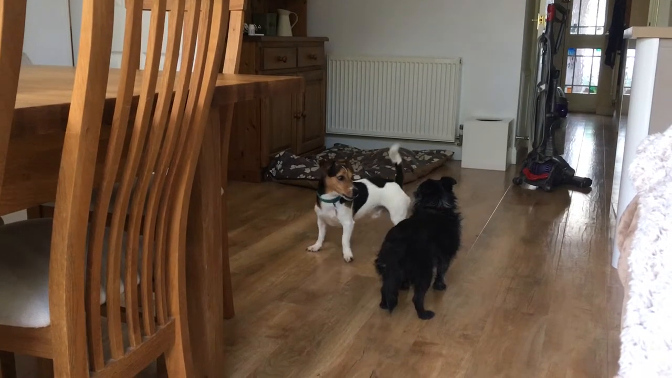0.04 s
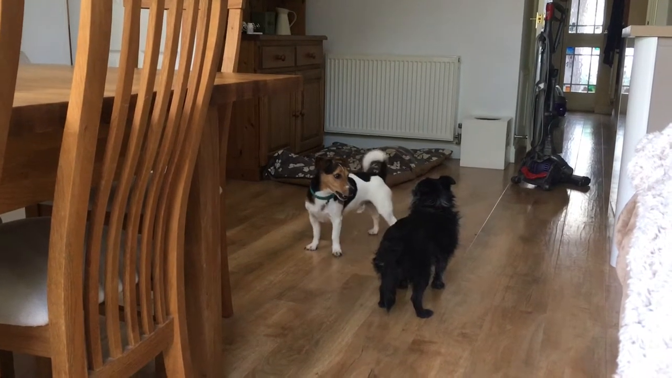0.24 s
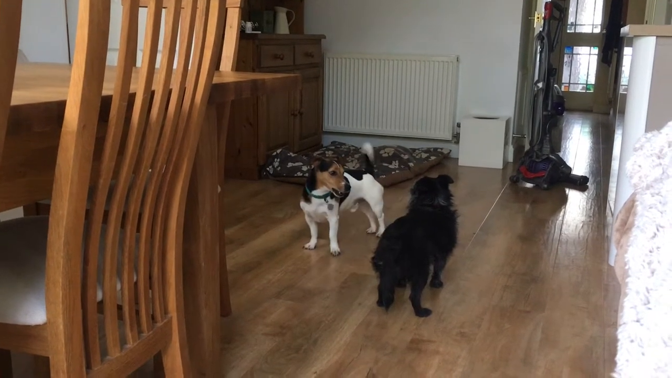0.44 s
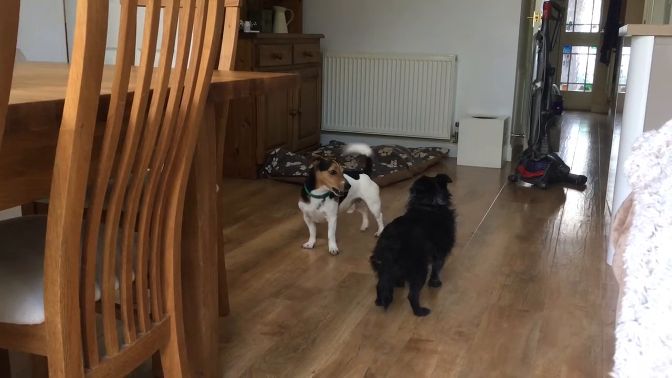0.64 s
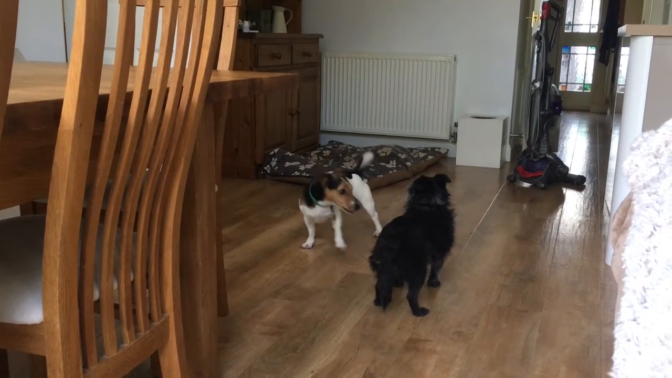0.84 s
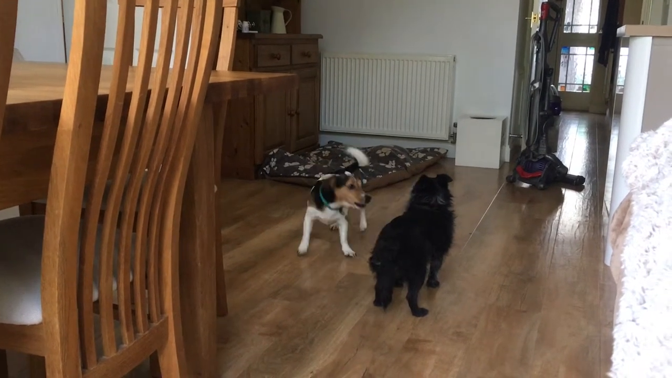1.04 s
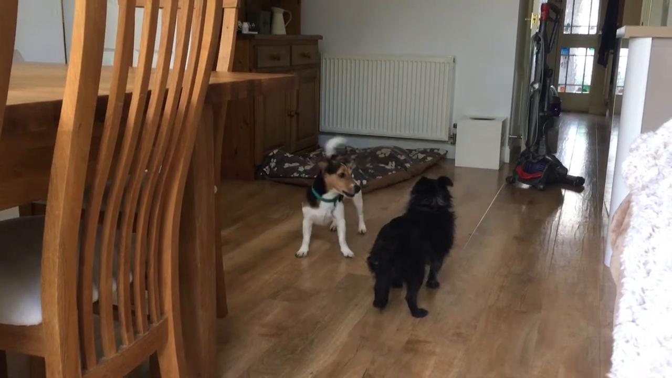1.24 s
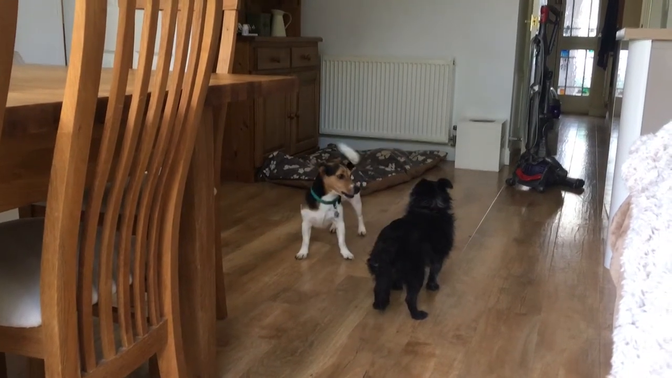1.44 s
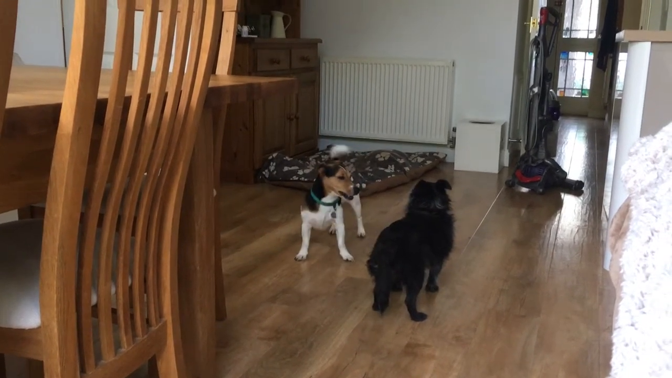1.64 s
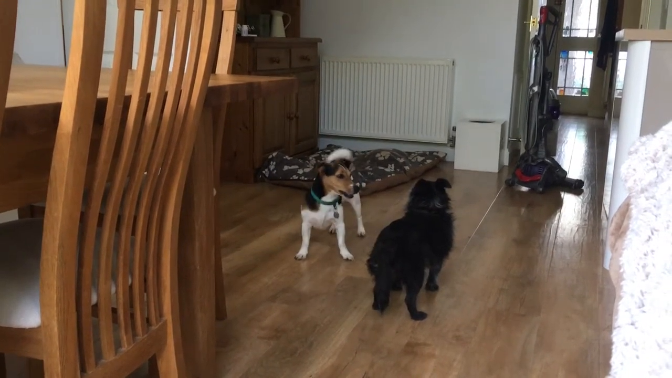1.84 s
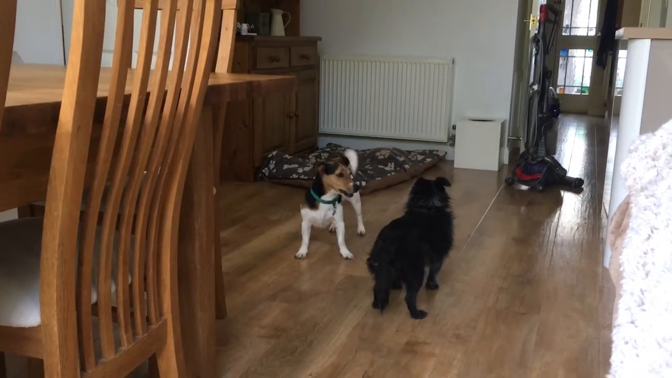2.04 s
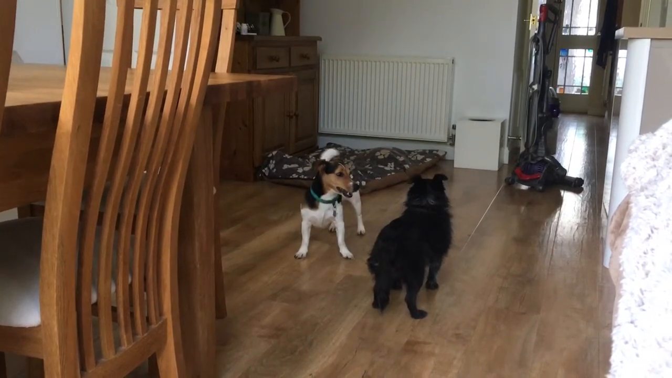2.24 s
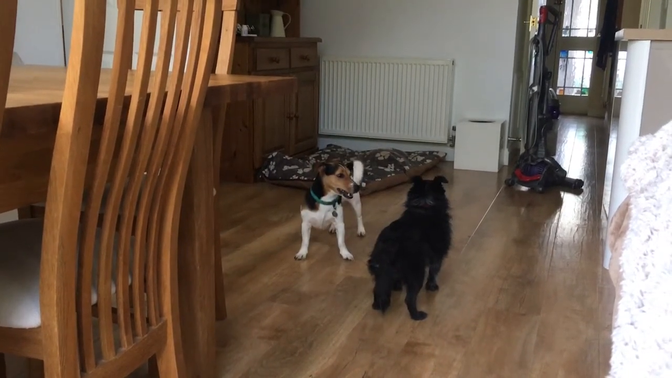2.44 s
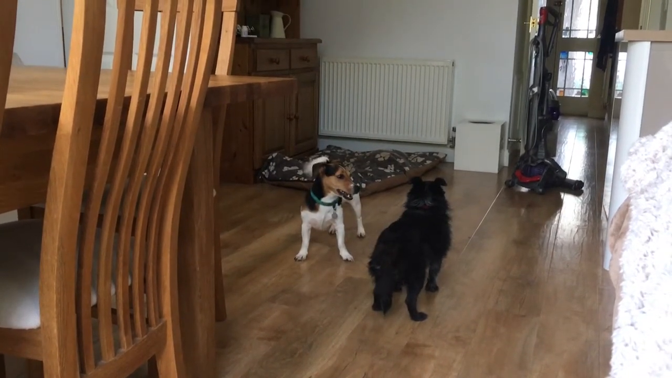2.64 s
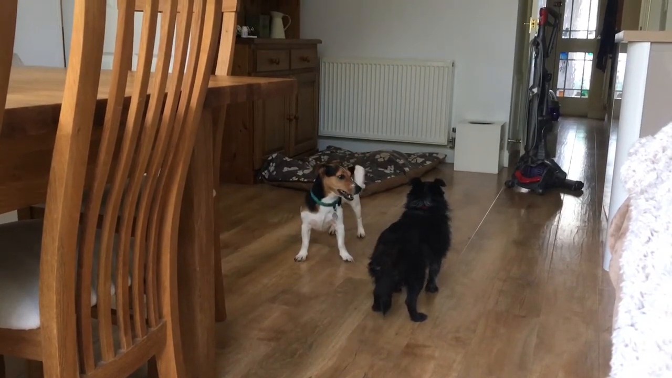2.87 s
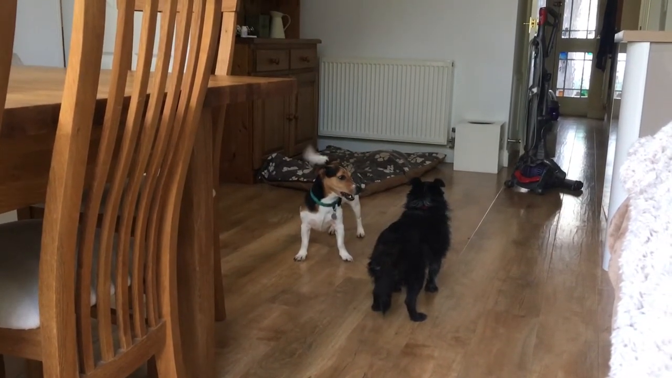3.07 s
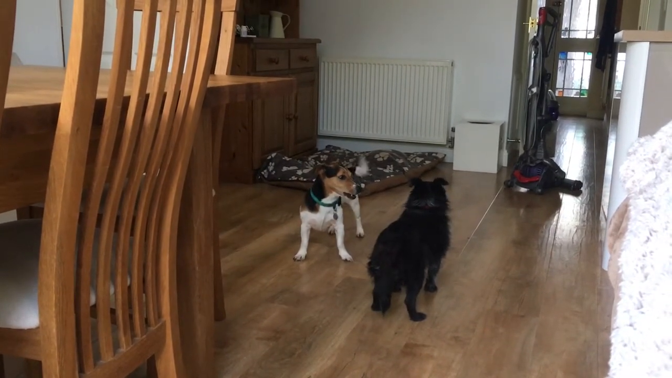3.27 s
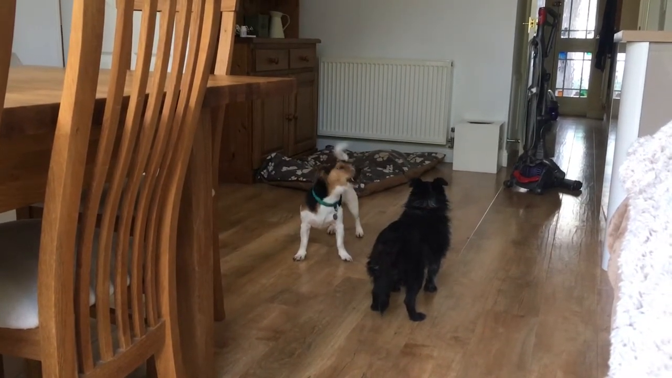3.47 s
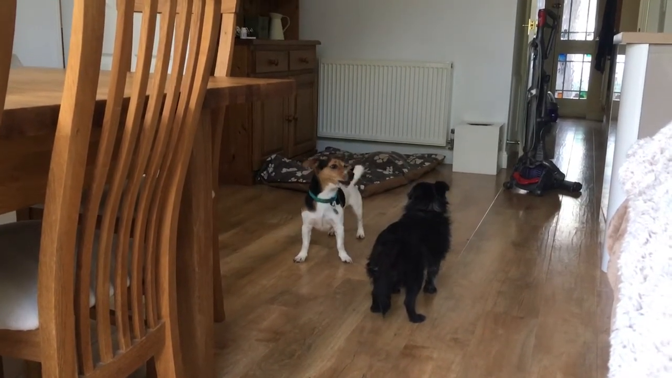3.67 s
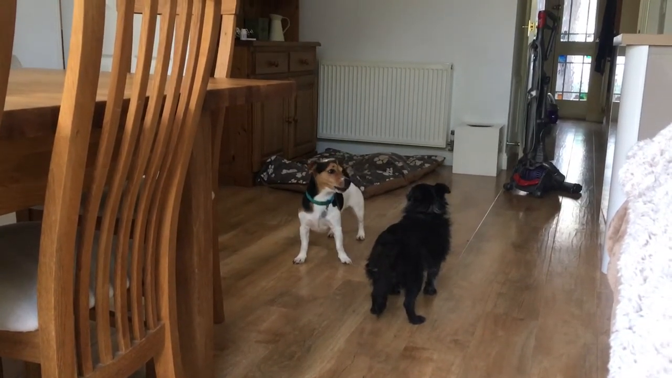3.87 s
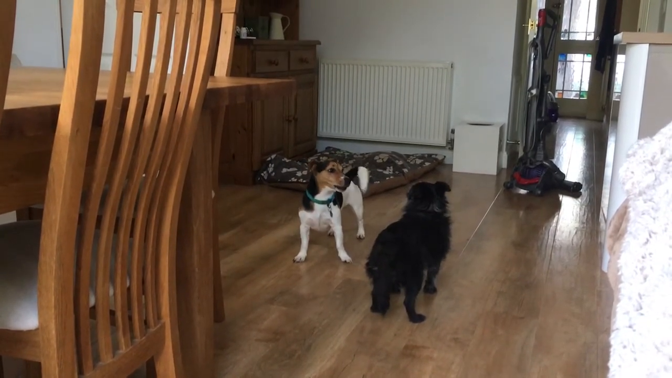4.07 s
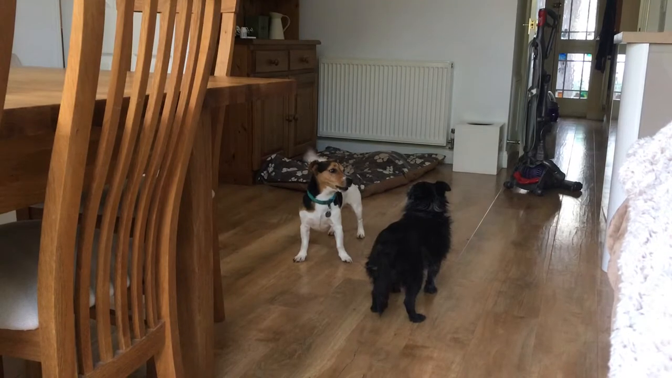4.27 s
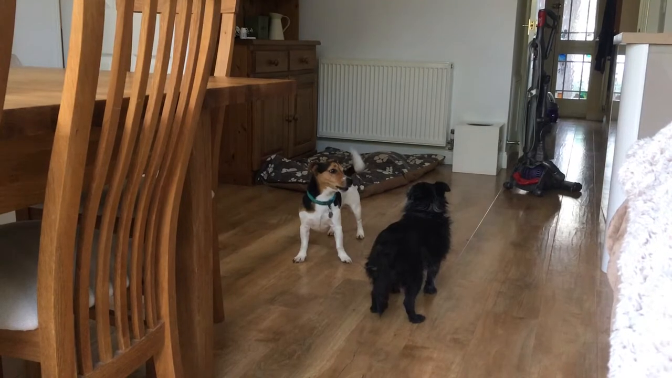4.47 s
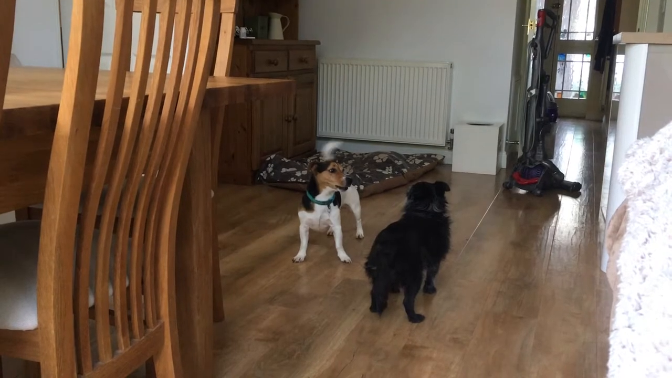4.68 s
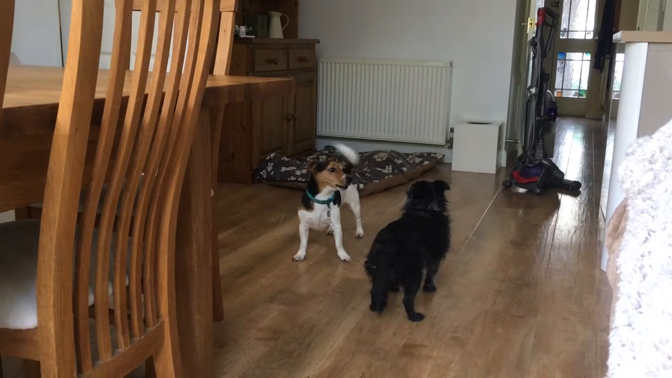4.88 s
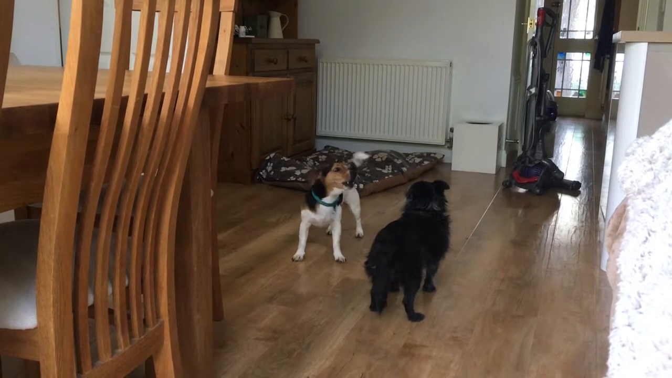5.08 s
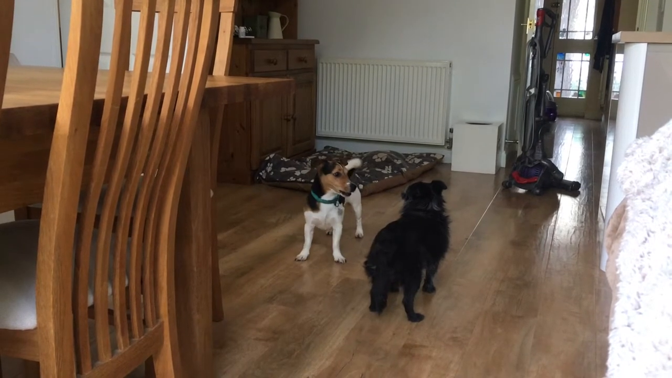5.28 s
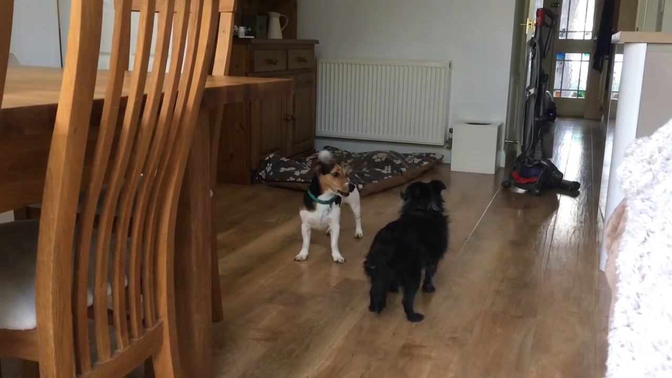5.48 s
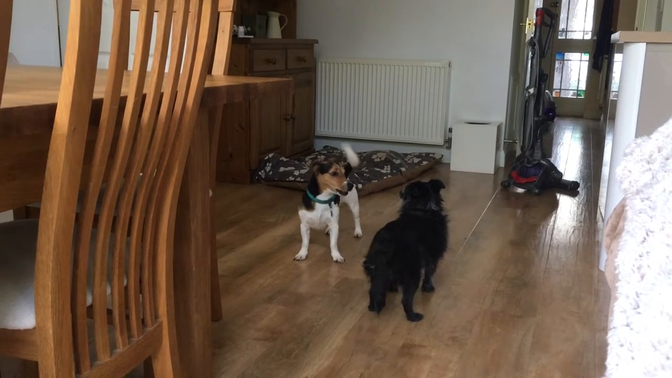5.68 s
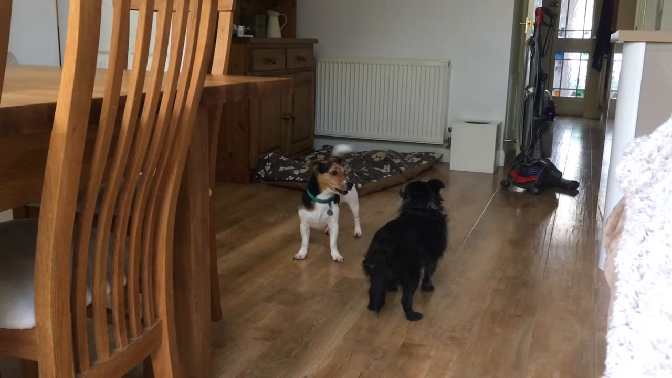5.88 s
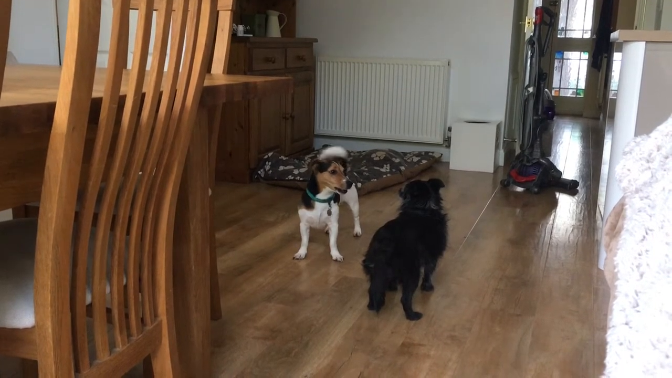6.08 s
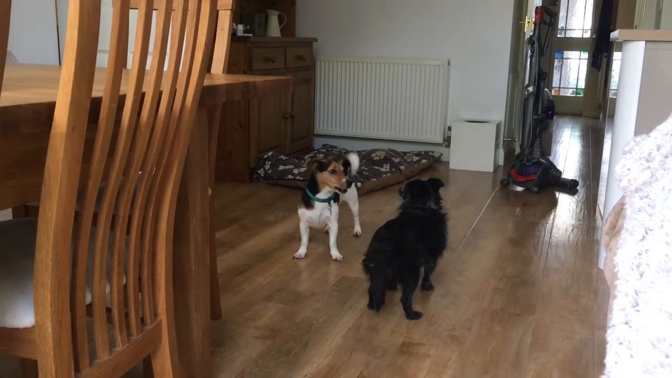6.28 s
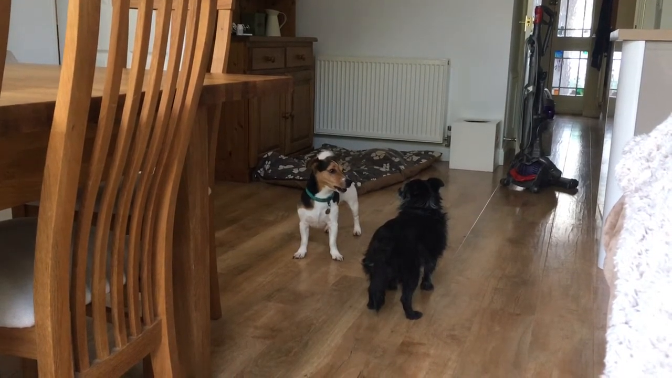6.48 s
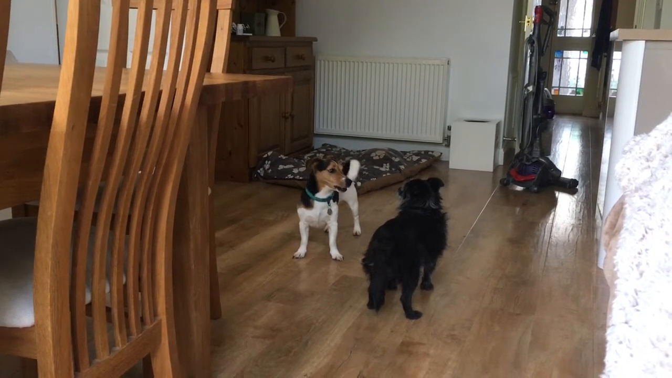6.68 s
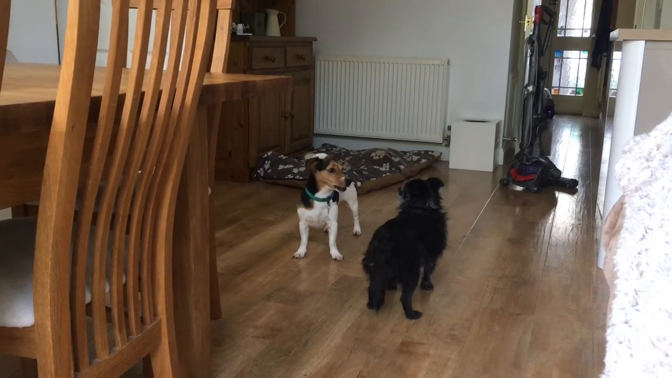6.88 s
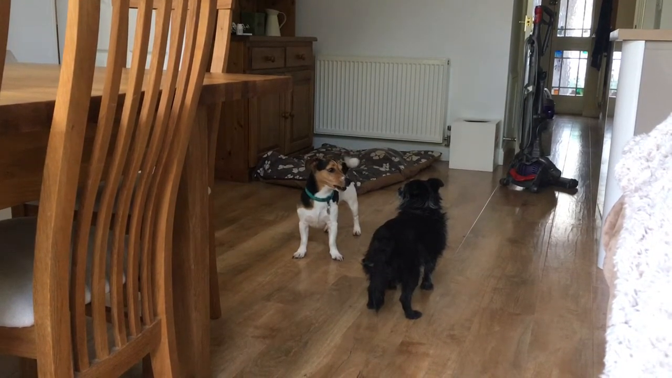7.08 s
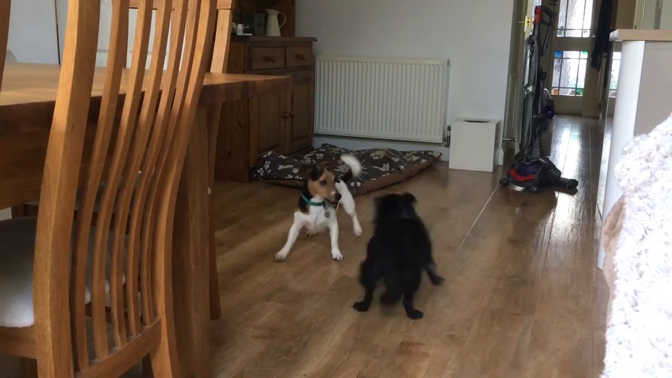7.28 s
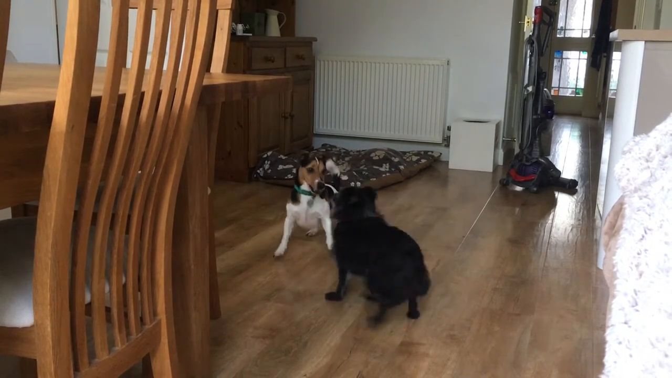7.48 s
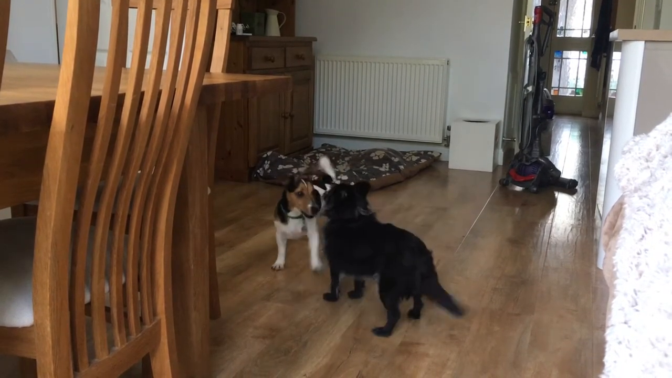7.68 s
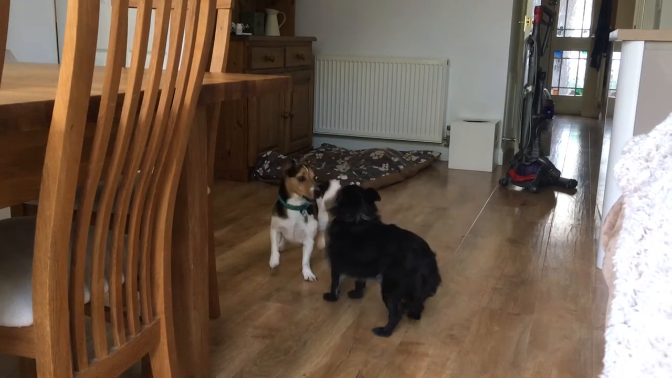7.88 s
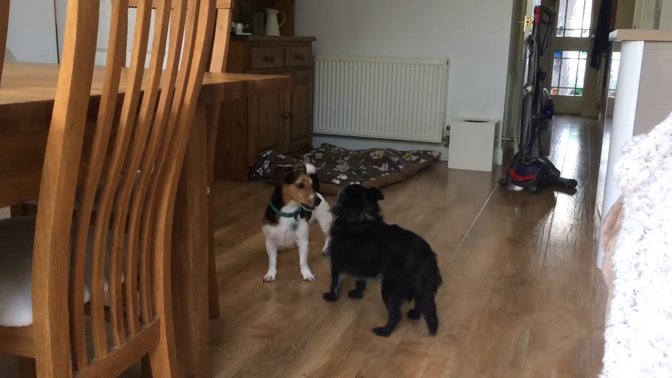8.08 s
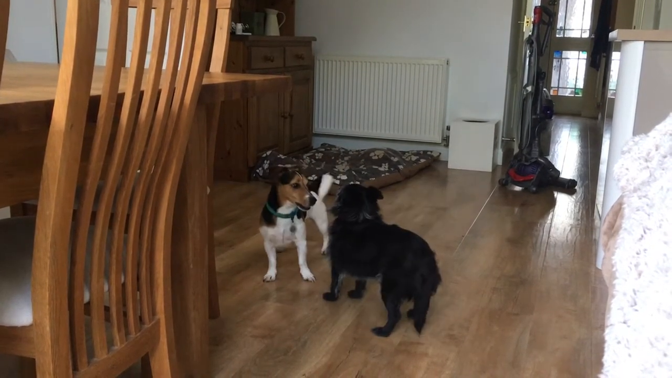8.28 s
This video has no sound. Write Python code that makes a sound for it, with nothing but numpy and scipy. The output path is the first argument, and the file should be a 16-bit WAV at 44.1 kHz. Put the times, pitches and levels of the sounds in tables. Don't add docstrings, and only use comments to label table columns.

```python
import sys
import numpy as np
from scipy import signal
from scipy.fft import rfft, irfft
from scipy.io import wavfile
from scipy.ndimage import uniform_filter1d, minimum_filter1d

SR = 44100
rng = np.random.default_rng(int(sys.argv[2]) if len(sys.argv) > 2 else 0)


def level_to_linear(level):
    exponent = np.asarray(level, float) / 20
    return 10 ** exponent


def wav_record(signal):
    frames = np.transpose(np.atleast_2d(signal))
    bounded = np.clip(frames, -1, 1)
    quanta = np.round(bounded * 32767).astype(np.int16)
    wavfile.write(sys.argv[1], SR, quanta)


N = 366912
LEAD = SR // 4

# time_s, effort_db, rate_per_s
WOOF = [
    (-.16, -31.5, 87),
    (-.12, -20, 168),
    (-.02, -27.5, 142),
    (.05, -36, 150),
    (.16, -51.5, 110),
]
# centre_hz, width_hz, level_db
WOOF_MUZZLE = [(616, 210, 5), (1040, 220, 2), (1415, 210, -7), (1730, 440, -17.5), (2260, 390, -26.5),
               (3830, 1040, -31.5), (5730, 740, -34), (6900, 460, -25), (8910, 1800, -25),
               (12800, 4000, -27)]
# start_s, swell_s, first_db, peak_db, first_rate_per_s
GROWLS = [
    (.957, 0.02, -50, -35, 170),
    (3.41, .13, -54.5, -32, 33),
    (4.88, .19, -63.5, -32.5, 45),
]
# centre_hz, width_hz, level_db
CHEST = [(105, 17, -9.5), (152.78, 86, -4.5), (285, 130, -1)]
# centre_hz, width_hz, level_db
MUZZLE = [(620, 300, 2.5), (850, 140, -9.5), (1118.8, 140, 5), (1480, 100, -13.5), (1850, 200, -10.5),
          (2110, 120, -12), (2500, 200, -13), (3900, 800, -17.5), (5950, 560, -18), (9600, 2400, -17.5)]
# band_hz, t60_s
ROOM_DECAY = [(100, .45), (300, 0.49), (700, .62), (1500, 0.61), (3000, 0.57), (5000, 0.48), (8000, 0.4),
              (11000, .38), (16000, .28)]
# mode_hz, level_db
STANDING_WAVES = [(598, 0), (666, 5.5), (1031, 3.5), (1088, 7.5), (1179, 5.5), (1339, 2), (1832, -0.5),
                  (1900, 5)]
# band_hz, density_db_per_hz
HUSH_TONE = [(35, -30), (60, -3), (76, -17), (118, -20.5), (156, -18.5), (417, -29.5), (553, -36.5),
             (882, -33), (1440, -42.5), (1950, -39.5), (2190, -39.5), (7940, -43.5), (14600, -37.5),
             (16000, -41.5)]
# time_s, level_db
HUM_COURSE = [(0, -59), (2.5, -56.5), (6, -61.5), (8.32, -60.5)]
# partial_hz, level_db
HUM_PARTIALS = [(48.5, -3), (97, -14)]
# start_s, length_s, peak_db, first_hz, last_hz
WHINES = [
    (.12, .11, -52, 1704, 2290),
    (3.75, .09, -49, 325, 235),
    (5.267, .09, -50.5, 313, 230),
]
# time_s, peak_db, room_share_db
CLAWS = [(0.2259, -42, 1.5), (0.2432, -41, -3.5), (1.6661, -57, 4.5), (1.922, -58.5, -4.5),
         (3.1676, -54, 2.5), (7.2539, -27, 2), (7.3706, -29.5, -1), (7.4824, -34, 3), (7.5248, -42, 1.5),
         (7.5488, -37.5, -2), (7.6096, -33.5, -4), (7.654, -32.5, -3), (7.666, -36.5, -4),
         (7.7332, -34, -6.5), (7.7677, -52.5, -0.5), (7.8309, -35.5, -4.5), (7.892, -41.5, -2.5),
         (7.9264, -38, -2.5), (8.0935, -41.5, -1.5), (8.1584, -43.5, -6.5)]
# time_s, peak_db
JINGLES = [(0.3151, -63), (0.4275, -57.5), (0.5112, -72), (0.82, -59), (0.9352, -70), (1.6646, -60),
           (1.9005, -72), (1.9235, -56), (2.7916, -71), (3.1674, -65.5), (6.0581, -68), (6.7466, -76.5),
           (7.7677, -56), (7.875, -51), (7.892, -49), (7.9259, -43), (7.9887, -43.5), (8.0217, -56),
           (8.0494, -57.5), (8.1584, -43.5)]
# mode_hz, level_db, t60_s
TAG_MODES = [(8860, -1.5, .15), (8560, -2.5, 0.099), (8400, -10.5, 0.065), (11700, -14, 0.12),
             (12696, -18, .08), (15080, -18.5, 0.033)]
# time_s, peak_db
BUCKLE = [(7.256, -43.5), (7.292, -49), (7.372, -55), (8.032, -67)]
# mode_hz, level_db, t60_s
BUCKLE_MODES = [(9700, 1.5, 0.2), (9980, -8, .15), (14990, -0.5, 0.15)]
# start_s, peak_db, length_s, mouth_opening_factor
PANTS = [(.62, -77, 0.15, 1), (.805, -68, 0.13, 0.86), (1.77, -71.5, 0.15, 0.98), (2.18, -65.5, 0.15, 1.02),
         (2.54, -68, 0.18, 1.02), (2.9, -65, 0.16, 1), (3.295, -63.5, 0.21, 1.04), (4.58, -73, 0.15, 0.98),
         (5.74, -74, .18, 0.99), (7.783, -67.5, 0.11, 1.06), (8.24, -77, .1, 1.01)]
# centre_hz, width_hz, level_db
PANT_MOUTH = [(660, 230, 1), (965, 220, -14.5), (1420, 320, 0.5), (2000, 400, -10.5), (2480, 370, 0.5),
              (3100, 400, -5), (3900, 600, -15.5), (5972, 6600, -25)]
# start_s, length_s, effort_db, top_pitch_hz, end_fade_db
BARKS = [
    (.967, .145, -15.5, 675.5, 0.5),
    (3.522, 0.16, -15, 647.7, -2),
    (5.056, .165, -15, 640.6, -0.5),
]
# centre_hz, width_hz, level_db
THROAT = [(790, 250, -7), (1060, 200, -1.5), (1330, 160, -4), (1620, 250, -10), (2150, 300, -16),
          (2750, 450, -20), (3200, 420, -18)]
# centre_hz, width_hz, level_db
RASP = [(3750, 800, -4.5), (4710, 400, 1.5), (5300, 510, -7), (6460, 600, 0), (7150, 360, -8),
        (8527, 770, 5), (9530, 1200, -9), (11000, 800, -4), (12300, 1800, -7.5), (14200, 1200, -8),
        (15320, 1000, -6)]
# time_s, peak_db, board_hz
THUDS = [(6.664, -48.5, 153), (6.714, -48.5, 154), (6.764, -55.5, 151), (6.814, -51.5, 157),
         (6.869, -62, 151), (6.993, -54.5, 151), (7.048, -59, 150), (7.256, -55, 148.4),
         (7.369, -54.5, 139)]
# start_s, peak_db, t60_s
SCUFFS = [(7.2, -63, .6), (7.24, -48, .4), (7.35, -56, 1.4), (7.6, -61.5, 1.2), (7.9, -66.5, .9),
          (8.14, -64.5, .3)]
# band_hz, density_db_per_hz
SCUFF_TONE = [(1760, -13), (3000, -7.5), (4930, -14), (6130, -3.5), (8520, -8.5), (9870, 1.5),
              (10700, -16.5), (15400, 0.5), (16000, -14)]
# start_s, peak_db, length_s, note_hz
SKIDS = [(7.209, -60.5, 0.18, 2350), (7.357, -60.5, 0.088, 1480), (7.54, -71, 0.11, 2900),
         (7.788, -69.5, .14, 1500), (8.108, -75.5, 0.035, 2000)]
# band_hz, density_db_per_hz
COARSE_TONE = [(150, -29), (400, 2.5), (2000, 1), (8000, -3.5), (16000, -8.5)]


def evened(x):
    return x / np.sqrt(np.mean(x ** 2) + 1e-20)


def read(points, hz):
    f, value = np.transpose(points)
    return np.interp(np.log(hz + 1), np.log(f + 1), value)


def unroll(rows):
    s, *columns = np.transpose(rows)
    t = np.arange(s[0], s[-1], 1 / SR)
    return s[0], [np.interp(t, s, c) for c in columns]


def add(mix, s, sound):
    part = mix[round(s * SR) + LEAD:][:len(sound)]
    part += sound[:len(part)]


def resonate(x, hz, width):
    turn = np.exp(2j * np.pi * np.cumsum(hz * np.ones(len(x))) / SR)
    r = np.exp(-np.pi * width / SR)
    return 2 * (turn * signal.lfilter([(1 - r) ** 2], [1, -2 * r, r * r], x / turn)).real


def tract(x, modes, opening):
    return evened(sum((-1) ** k * level_to_linear(db) * resonate(x, hz * opening, w)
                      for k, (hz, w, db) in enumerate(modes)))


def wobble(size, span):
    return evened(uniform_filter1d(uniform_filter1d(rng.standard_normal(size), span), span))


def coloured(points, size):
    hz = np.fft.rfftfreq(size, 1 / SR)
    return evened(irfft(rfft(rng.standard_normal(size)) * level_to_linear(read(points, hz)), size))


def growl(rows, muzzle=MUZZLE, open_db=-10):
    s, (effort_db, rate) = unroll(rows)
    size = len(rate)
    turns = .9 + np.cumsum(rate * (1 + .1 * wobble(size, span=SR // 150))) / SR
    flaps = np.diff(np.floor(turns), prepend=0) * level_to_linear(2 * rng.standard_normal(size)) * np.sqrt(SR / rate)
    air = (0.6 + np.exp(-(turns % 1) / 0.4)) * rng.standard_normal(size)
    chest = tract(flaps + 0.8 * air, CHEST, 0.91)
    mouth = level_to_linear(open_db) * tract(0.15 * flaps + air, muzzle, 0.98)
    return s, level_to_linear(effort_db) * (chest + mouth) * signal.windows.tukey(size, .03)


def room(x):
    taps = np.zeros(SR)
    at = np.arange(160, SR - 20, 20)
    taps[at + rng.integers(0, 20, len(at))] = rng.choice([-1., 1.], len(at))
    hz, t, z = signal.stft(taps, SR, nperseg=256)
    tail = signal.istft(z * level_to_linear(-60 * t / read(ROOM_DECAY, hz)[:, None]), SR, nperseg=256)[1]
    tail = tail / np.linalg.norm(tail)
    t = np.arange(len(tail)) / SR
    tail = tail + sum(level_to_linear(db - 57.5 - 60 * t / .5) * np.sin(2 * np.pi * f * t) for f, db in STANDING_WAVES)
    return signal.fftconvolve(x, tail)[:len(x)]


def hush():
    duck_db, duck_s, hiss_db = -8.5, .55, -67
    t = np.arange(N) / SR
    ducked_db = sum(duck_db * np.sin(np.pi * np.clip((t - s) / duck_s, 0, 1)) for s, *_ in BARKS)
    turns = np.cumsum(1 + 0.028 * wobble(N, span=SR // 12)) / SR
    hum = sum(level_to_linear(db + 1.5 * wobble(N, span=SR // 10)) * np.sin(2 * np.pi * hz * turns)
              for hz, db in HUM_PARTIALS)
    hum_db = np.interp(t, *np.transpose(HUM_COURSE)) + ducked_db + 1.5
    return level_to_linear(hum_db) * hum + level_to_linear(hiss_db) * coloured(HUSH_TONE, N)


def whine(s, length, peak_db, first_hz, last_hz):
    hz = np.geomspace(first_hz, last_hz, round(length * SR))
    air = rng.standard_normal(len(hz))
    width = .1 * hz.mean()
    octave = level_to_linear(-14.5) * resonate(air, hz.mean() * 1.92, 4 * width)
    squeak = evened(resonate(air, hz, width) + octave)
    return s, level_to_linear(peak_db) * squeak * np.sin(np.linspace(0, np.pi, len(hz))) ** 1.5


def claw(hz):
    t = np.arange(SR // 50) / SR
    scrape = rng.standard_normal(len(t)) * (np.exp(-t / .0008) + 0.51 * np.exp(-t / 0.0014))
    tick = np.diff(resonate(scrape, min(hz, 15500), 14000), prepend=0)
    return level_to_linear(-9.0) * tick / np.std(tick[:SR // 500])


def ring(modes, factor):
    t = np.arange(SR // 4) / SR
    chatter = (1 - np.exp(-t / .005)) * level_to_linear(3.5 * wobble(len(t), span=SR // 250))
    return chatter * sum(level_to_linear(db - 60 * t / t60) * np.sin(2 * np.pi * hz * factor * t) for hz, db, t60 in modes)


def pant(s, peak_db, length, mouth):
    size = round(length * SR)
    puff = np.sin(np.pi * np.linspace(0, 1, size) ** 0.7) ** 0.79
    return s, level_to_linear(peak_db) * tract(rng.standard_normal(size), PANT_MOUTH, mouth) * puff


def swell(s, length, first_db, peak_db, first_rate):
    top_per_s, tail_s, tail_db = 175, .09, -13
    return [(s, first_db, first_rate),
            (s + .75 * length, 0.82 * peak_db + .3 * first_db, 1.4 * first_rate),
            (s + length, peak_db, top_per_s),
            (s + length + tail_s, peak_db + tail_db, top_per_s)]


def bark(s, length, effort_db, top_hz, fade_db):
    attack_s, attack_db = .058, -29
    pitch_shut, pitch_lag, climb_s, pitch_drop = .89, .08, .11, .07
    second_top_hz, second_shut, second_sag, second_grow_db = 1295, .86, .12, 4
    low_db, low_shut_db, low_sag_db = -1.5, 7.5, -11.5
    sum_db, bright_db, bright_sag_db = -6, -15, -4.5
    t = np.arange(0, length, 1 / SR)
    size = len(t)
    slack = np.maximum(1 - t / attack_s, 0) ** 1.6
    spent = t / length
    closed = np.exp(-(t / 0.03) ** 2)

    climb = pitch_lag * np.maximum(1 - t / climb_s, 0)
    hz = top_hz * (1 - (1 - pitch_shut) * slack - climb - pitch_drop * spent ** 6)
    second_hz = second_top_hz * (1 - (1 - second_shut) * slack - second_sag * spent)
    turns = np.cumsum(hz * (1 + .018 * wobble(size, span=SR // 400))) / SR
    folds = evened(sum(np.sin(2 * np.pi * k * turns) for k in range(1, 24)))
    folds = folds * level_to_linear(2.5 * wobble(size, span=SR // 300))
    second = np.cos(2 * np.pi * np.cumsum(second_hz * (1 + 0.013 * wobble(size, span=SR // 300))) / SR)
    second = second * (1 + 0.79 * np.cos(2 * np.pi * turns))
    puffs = evened((0.44 + np.exp(-(turns % 1) / 0.47)) * rng.standard_normal(size))
    drive = .6 * folds + .3 * second + .8 * puffs

    middle = level_to_linear(second_grow_db * spent) * evened(resonate(drive, second_hz, 190))
    middle = middle + level_to_linear(8.5 - 10 * closed) * tract(drive, THROAT, 1 - 0.06 * closed)
    low = level_to_linear(low_db + low_shut_db * slack + low_sag_db * spent) * evened(resonate(drive, hz, 150))
    summed = level_to_linear(sum_db - 12 * closed) * evened(resonate(drive, hz + second_hz, 180))
    tongue = (1 - 0.08 * closed) * (1 + 0.026 * wobble(size, span=SR // 50))
    cavities = [(f, w, db + 3.3 * wobble(size, span=SR // 50)) for f, w, db in RASP]
    rasp_db = bright_db + bright_sag_db * spent - 13 * closed
    rasp = level_to_linear(rasp_db) * tract(1.2 * folds + puffs, cavities, tongue)
    effort = level_to_linear(effort_db + attack_db * slack + fade_db * spent + 1.6 * wobble(size, span=SR // 60))
    return s, effort * (evened(middle) + low + summed + rasp) * signal.windows.tukey(size, .2)


def thud(s, peak_db, hz):
    t = np.arange(SR // 12) / SR
    board = np.sin(2 * np.pi * hz * t) + level_to_linear(-8.0) * np.sin(2 * np.pi * 1.774 * hz * t)
    knock = level_to_linear(-7.5) * resonate(rng.standard_normal(len(t)), 595, 890)
    return s, level_to_linear(peak_db) * (board + knock) * (t / 0.0049) * np.exp(1 - t / 0.0037)


def scuff(s, peak_db, t60):
    rise_s = .025
    t = np.arange(SR // 2) / SR
    fall_db = peak_db - 60 * t / t60 + 2.5 * wobble(len(t), span=SR // 150)
    stroke = np.minimum(t / rise_s, 1) * level_to_linear(fall_db)
    return s, stroke * coloured(SCUFF_TONE, len(t)) * np.cos(np.pi * t)


def skid(s, peak_db, length, hz):
    rub = rng.standard_normal(round(length * SR))
    tone = evened(resonate(rub, hz, 0.13 * hz)) + level_to_linear(0.5) * evened(resonate(rub, 1.15 * hz, 2660))
    stroke = level_to_linear(peak_db + 2.0 * wobble(len(rub), span=SR // 80))
    return s, stroke * tone * np.sin(np.linspace(0, np.pi, len(rub)))


def scene():
    dog, near, far = np.zeros((3, N + LEAD))
    add(dog, *growl(WOOF, WOOF_MUZZLE, open_db=-3))
    for row in GROWLS:
        add(dog, *growl(swell(*row)))
    for source, rows in [(whine, WHINES), (pant, PANTS), (bark, BARKS), (thud, THUDS), (skid, SKIDS)]:
        for row in rows:
            add(dog, *source(*row))
    for s, db, room_db in CLAWS:
        tick = level_to_linear(db) * claw(hz=10933)
        add(near, s, tick)
        add(far, s, level_to_linear(room_db) * tick)
    for s, db in JINGLES:
        add(near, s, level_to_linear(db - 1.5) * ring(TAG_MODES, 0.98))
    for s, db in BUCKLE:
        add(near, s, level_to_linear(db) * ring(BUCKLE_MODES, 1))
    for row in SCUFFS:
        add(near, *scuff(*row))
    dog = signal.sosfilt(signal.butter(2, 70, "high", fs=SR, output="sos"), dog)
    wet = room(level_to_linear(-3.5) * dog + far + level_to_linear(-18) * near)
    return ((level_to_linear(3.0) * dog + near + wet)[LEAD:] + hush())[None]


def roll_off(x):
    return signal.sosfilt(signal.butter(12, 16490, fs=SR, output="sos"), x)


def record(dry):
    hold, trip_level, coarse_db, ceiling = round(.605 * SR), .34, -66, .7
    loud = abs(dry[0]) > trip_level
    above = np.cumsum(loud)
    recent = above - np.pad(above, (hold, 0))[:N] > 0
    trips = np.cumsum(np.diff(recent, prepend=False) & loud)
    coarse = trips - np.pad(trips, (hold, 0))[:N]
    lifted = dry + level_to_linear(coarse_db) * coarse * coloured(COARSE_TONE, N)
    peak = -minimum_filter1d(-abs(lifted[0]), SR // 250)
    limited = lifted / uniform_filter1d(np.maximum(peak / ceiling, 1), SR // 500)
    return roll_off(limited)


dry = scene()
out = record(dry)
wav_record(out)
```